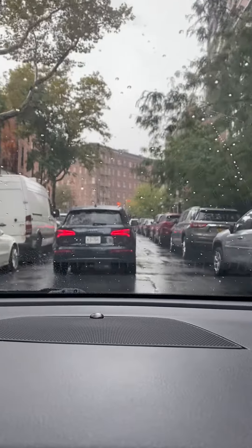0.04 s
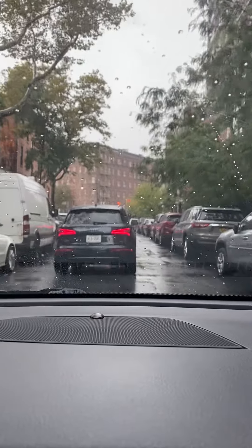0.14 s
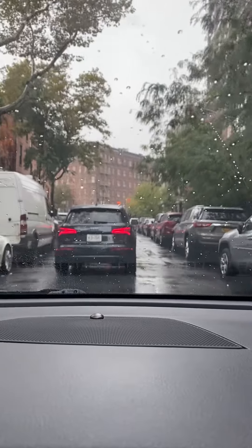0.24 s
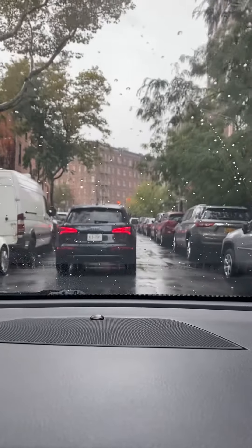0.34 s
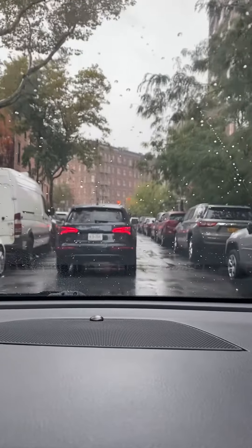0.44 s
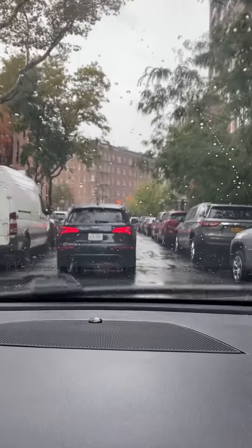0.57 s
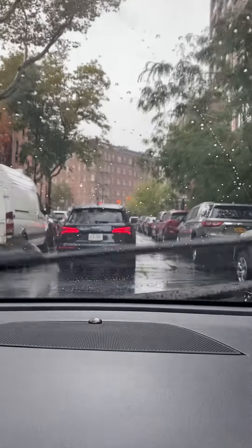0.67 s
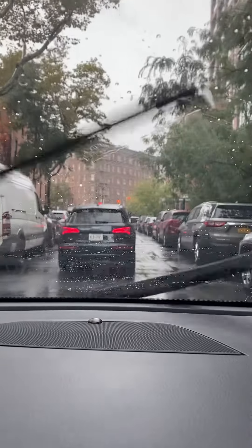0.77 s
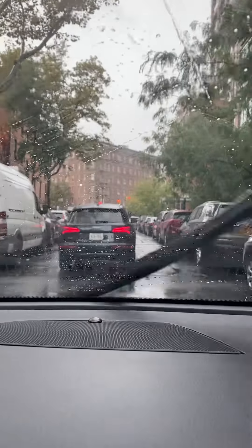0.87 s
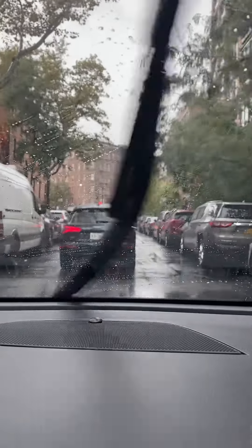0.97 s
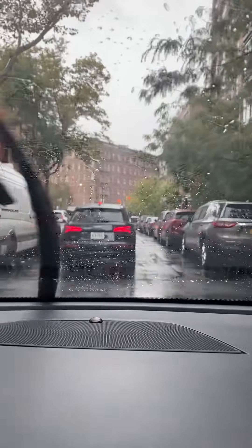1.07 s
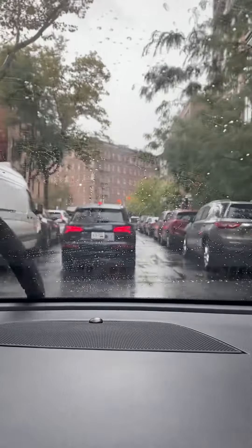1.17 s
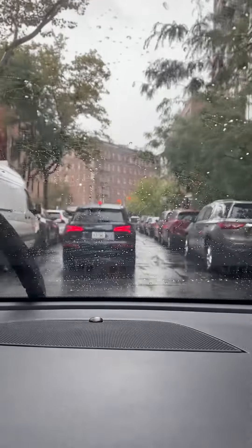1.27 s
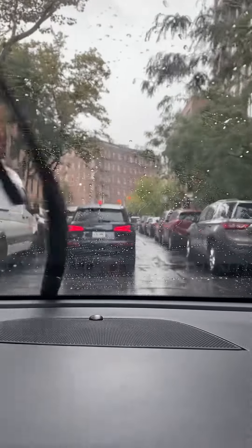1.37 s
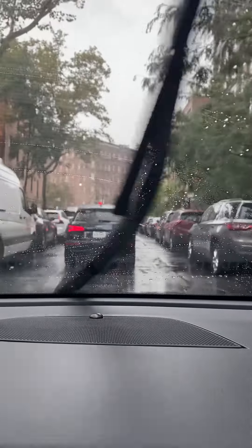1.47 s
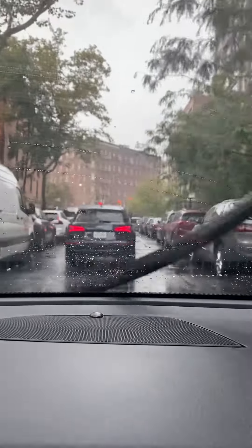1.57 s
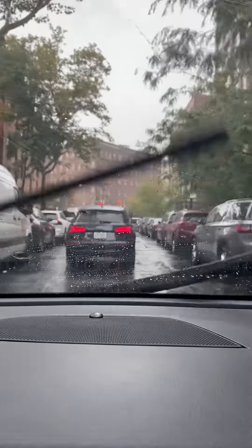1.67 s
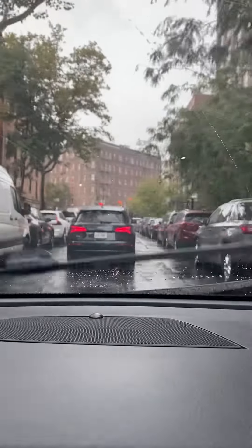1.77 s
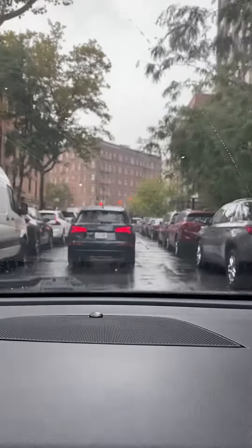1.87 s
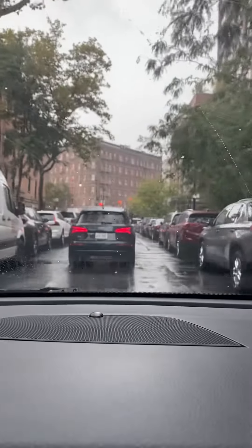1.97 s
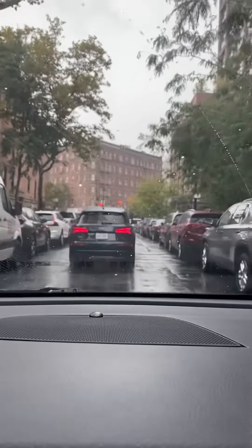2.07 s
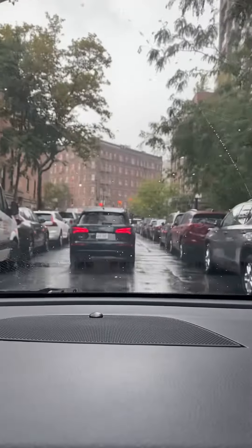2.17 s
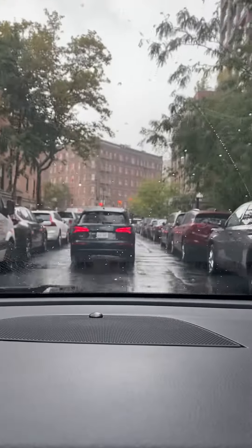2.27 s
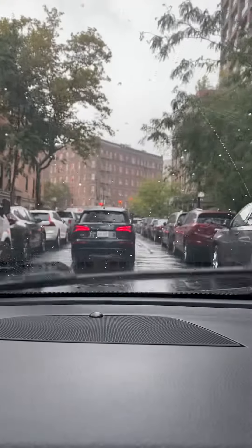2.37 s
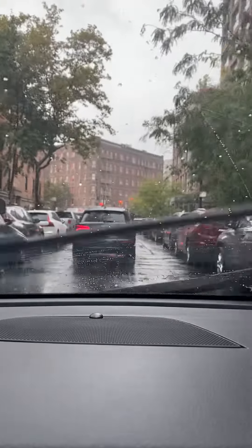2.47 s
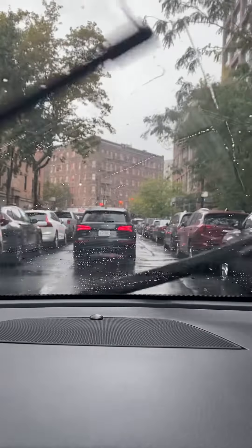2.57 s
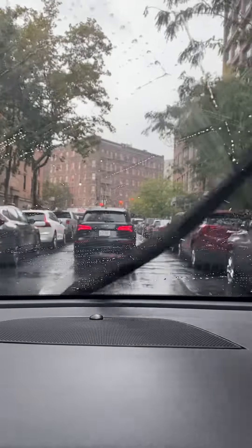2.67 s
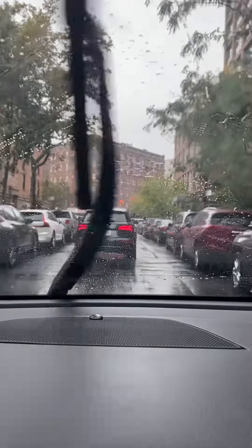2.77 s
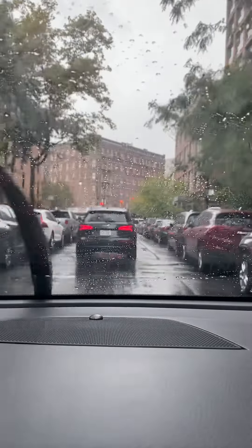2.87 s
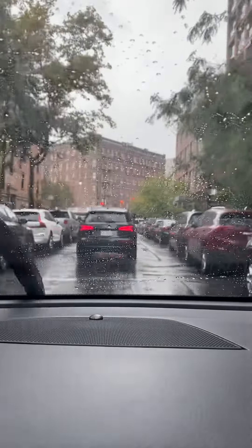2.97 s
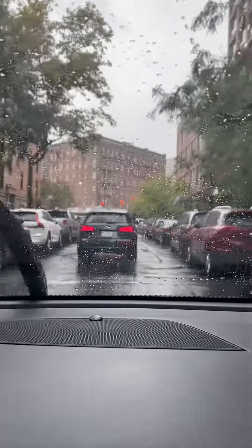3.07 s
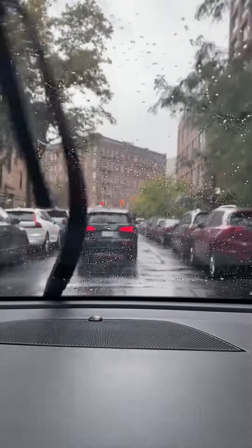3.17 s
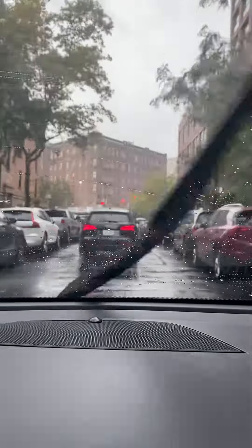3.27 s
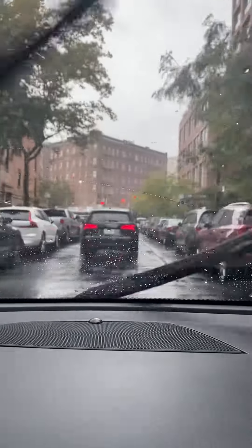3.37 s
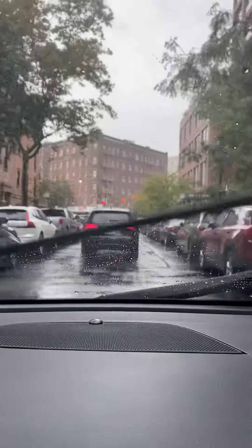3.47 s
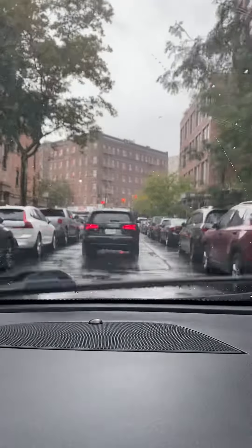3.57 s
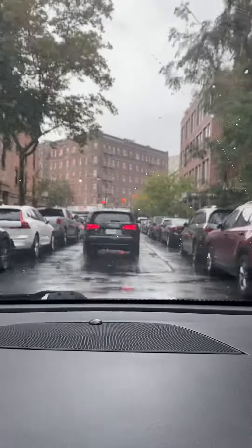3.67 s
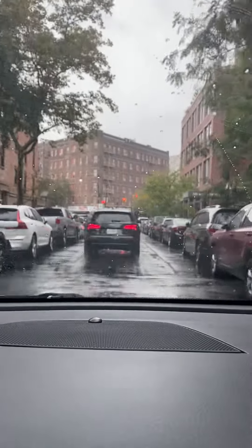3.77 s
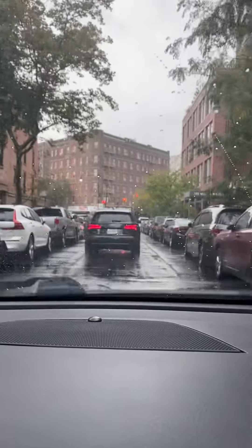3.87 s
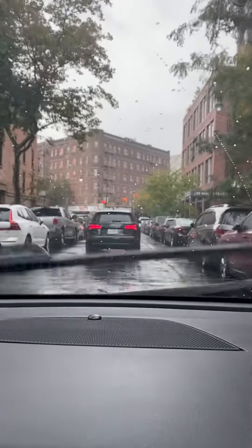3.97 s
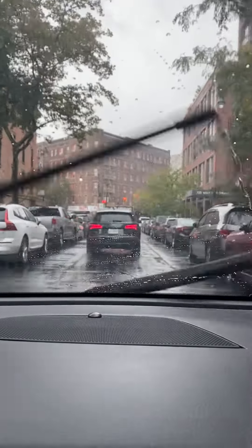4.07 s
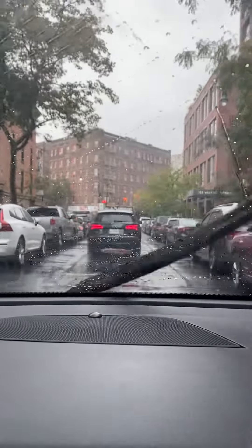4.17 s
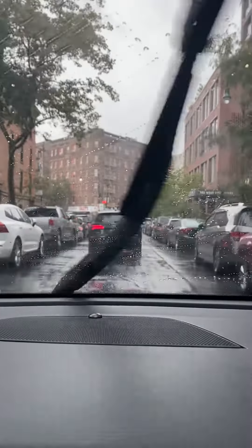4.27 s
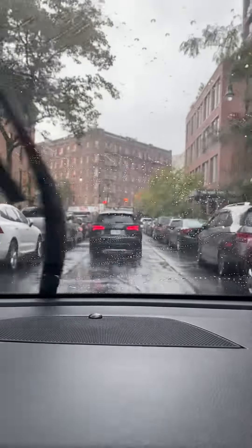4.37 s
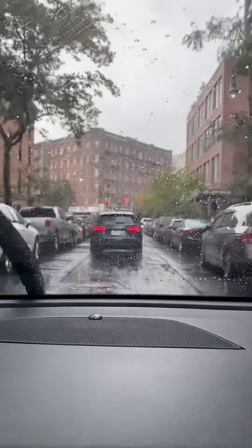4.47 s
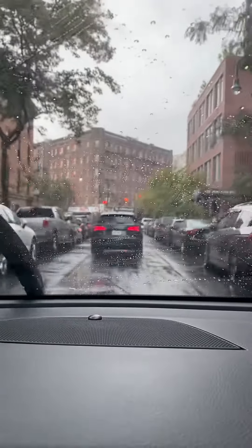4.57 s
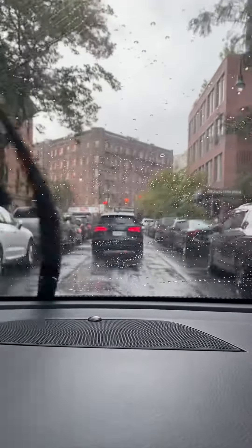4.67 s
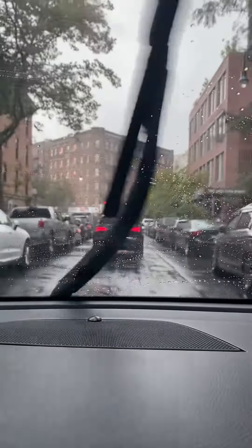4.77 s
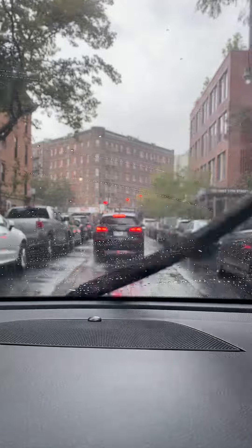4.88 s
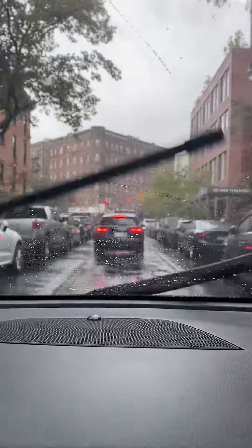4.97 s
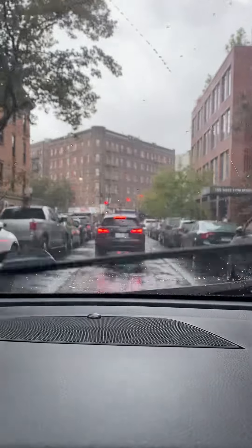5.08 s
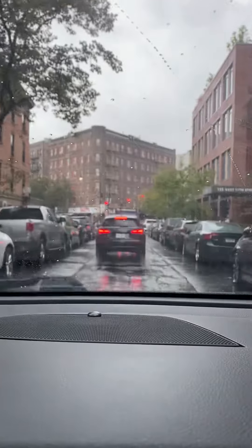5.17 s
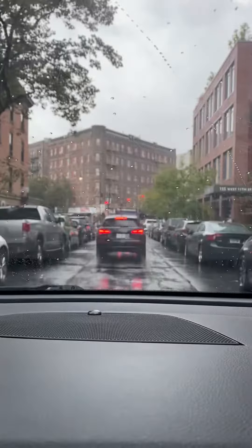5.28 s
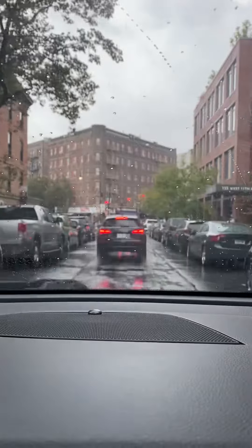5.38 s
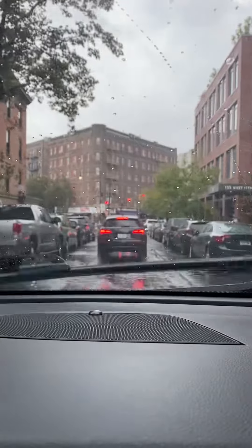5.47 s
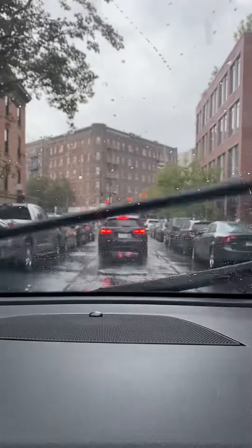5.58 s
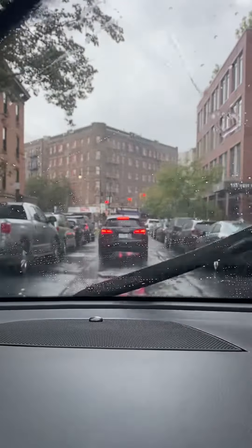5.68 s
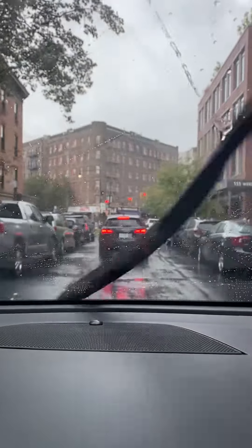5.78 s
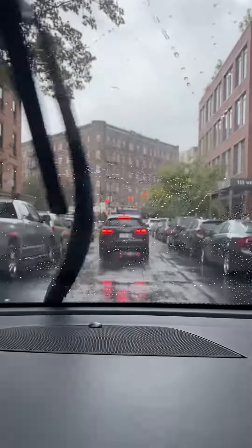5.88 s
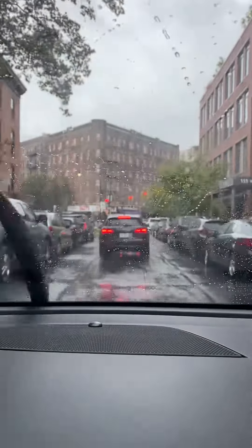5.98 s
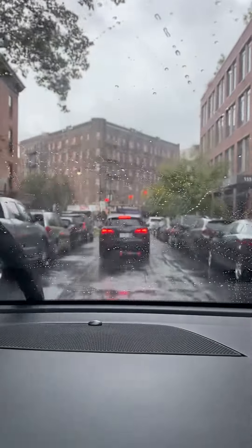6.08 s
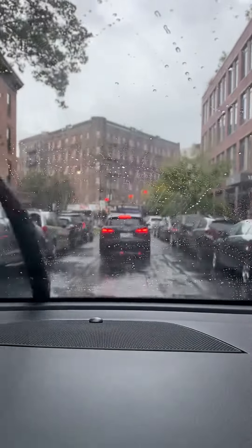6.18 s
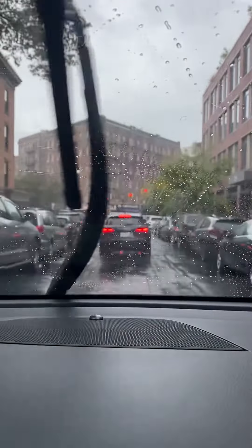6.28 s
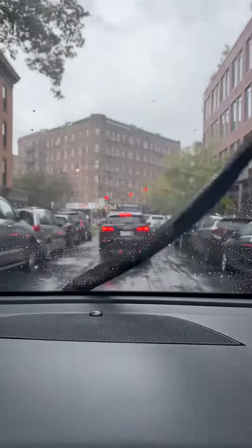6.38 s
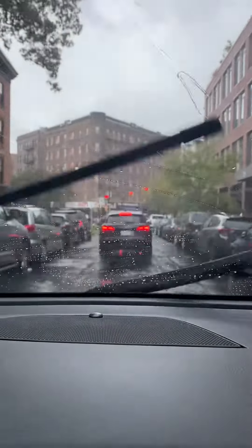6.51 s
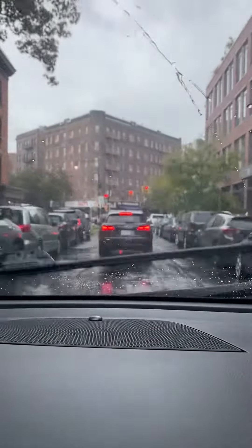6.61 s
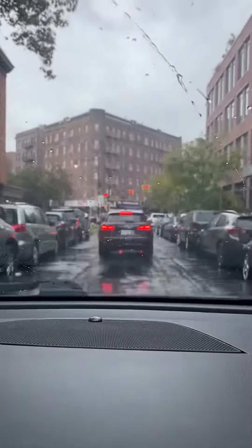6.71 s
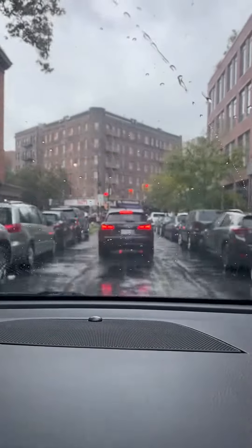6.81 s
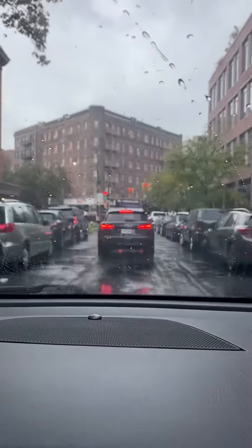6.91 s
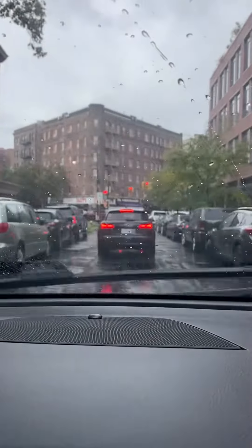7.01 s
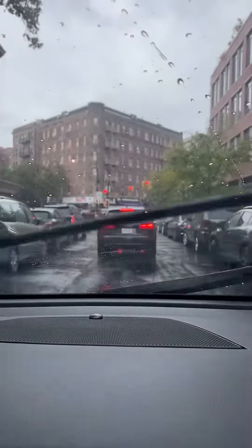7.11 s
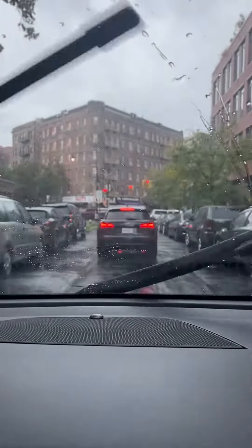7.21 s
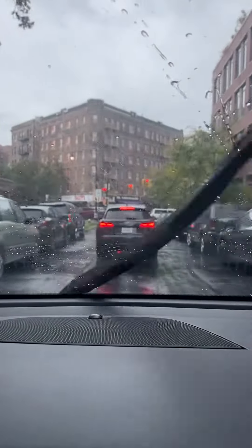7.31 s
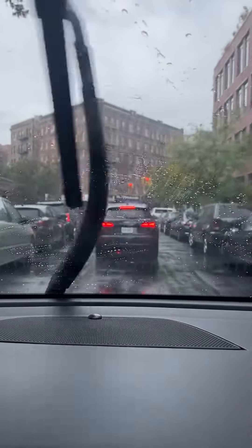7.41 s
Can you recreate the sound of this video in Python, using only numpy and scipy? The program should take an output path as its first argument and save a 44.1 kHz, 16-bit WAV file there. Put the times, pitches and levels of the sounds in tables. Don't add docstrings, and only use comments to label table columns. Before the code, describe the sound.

A muffled car interior in rain, picked up in stereo by a phone above the dashboard. Deep cabin boom and dull road roar run throughout, with faint wet wash. A low engine hum swells from 0.1 seconds and vanishes around 1.4, followed by very faint panel hums until 2.3. Wiper strokes begin near 0.5, 2.3, 3.85, 5.4 and 6.95 seconds. Each starts with a slight squeak or creak, judders upward in several rubbery low grunts, then drags down in longer scrapes for about 0.7 seconds overall; the last is higher, groaning and weaker in scrape. Raindrops tick irregularly, with a bright splat at 2.15 and stronger ones near 5.6 and 5.75. Soft knocks accompany the mechanism, notably a low one at 5.1 and a sharper one at 7.0. Uneven tarmac thumps softly, and the rumble grows heavier after 5 seconds, ending mid-drive.

```python
import sys
import numpy as np
from scipy import signal
from scipy.fft import rfft, irfft, next_fast_len
from scipy.io import wavfile
from scipy.ndimage import uniform_filter1d

SR = 44100
rng = np.random.default_rng(int(sys.argv[2]) if len(sys.argv) > 2 else 0)


def file_out(sig):
    cols = np.atleast_2d(sig).T
    lim = np.clip(cols, -1, 1)
    pcm = np.round(lim * 32767).astype(np.int16)
    wavfile.write(sys.argv[1], SR, pcm)


def to_linear_factor(level_db):
    exponent = np.asarray(level_db, float) / 20
    return 10 ** exponent


N = 328545
SIZE = next_fast_len(N)
T, HZ = np.arange(N) / SR, np.fft.rfftfreq(SIZE, 1 / SR)


def evened(x):
    return x / np.sqrt(np.mean(x ** 2) + 1e-20)


def read(points, hz, axis=1):
    table = np.transpose(points)
    return np.interp(np.log(hz + 1), np.log(table[0] + 1), table[axis])


def curve(rows, axis):
    table = np.transpose(rows)
    return np.interp(T, table[0], table[axis])


def passed(x, gain_db):
    return irfft(rfft(x, SIZE) * to_linear_factor(gain_db), SIZE)[..., :N]


def colour(x, gain_db):
    return evened(passed(x, gain_db))


def band_db(lo_hz, hi_hz, order=3):
    below = 1 + (lo_hz / (HZ + 1)) ** (2 * order)
    above = 1 + (HZ / hi_hz) ** (2 * order)
    return -10 * np.log10(below * above)


def wobble(rate_hz):
    return colour(rng.standard_normal(N), band_db(.3, rate_hz, order=1))


def grains(per_s, spread_db, smear_s):
    size = to_linear_factor(spread_db * np.minimum(rng.exponential(1, N), 4))
    size = size * (rng.random(N) < per_s / SR)
    t = np.arange(2048) / SR
    echoes = rng.standard_normal((2, len(t))) * np.exp(-t / smear_s)
    smeared = signal.oaconvolve(size * rng.standard_normal((2, N)), echoes, axes=1)[:, :N]
    lasting_db = 10 * np.log10(uniform_filter1d(abs(rfft(echoes, SIZE)) ** 2, size=600, axis=1))
    return colour(smeared, -lasting_db)


def resonate(x, hz, width):
    turn = np.exp(2j * np.pi * np.cumsum(hz) / SR)
    r = np.exp(-np.pi * width / SR)
    return evened((turn * signal.lfilter([1 - r], [1, -r], x / turn)).real)


def patchy(x, depth_db):
    hz, t, z = signal.stft(x, nperseg=1024, noverlap=768)
    field = uniform_filter1d(rng.standard_normal(z.shape[1:]), size=4, axis=0)
    field = evened(uniform_filter1d(field, size=5, axis=1))
    return evened(signal.istft(z * to_linear_factor(depth_db * field), nperseg=1024, noverlap=768)[1][:, :N])


# (start [s], highest ring [Hz], extra arm groan [dB])
WIPE_STARTS = [
    (0.519, 237.5, -1),
    (2.31, 258, 1.1),
    (3.85, 255, 0.5),
    (5.389, 249.3, 0.7),
    (6.941, 295, 3),
]


def since_wipe():
    start, top_hz, groan_db = np.transpose(WIPE_STARTS)
    k = np.clip(np.searchsorted(start - .3, T) - 1, 0, None)
    return T - start[k], top_hz[k], groan_db[k]


# (peak [s], rise [s], fall [s], scrape level [dB], water hiss minus scrape [dB])
UP_JUDDERS = [(0.546, 0.018, 0.0046, -39.5, -21), (0.613, 0.027, .015, -23.5, -27.5),
              (0.689, 0.032, .017, -26, -21.5), (.772, 0.022, .035, -30, -18),
              (.854, 0.034, 0.029, -39, -30.5), (2.4, 0.034, .01, -25.5, -31),
              (2.453, 0.016, .03, -28.5, -16), (2.553, .028, .019, -28.5, -17),
              (2.601, 0.0061, 0.029, -34.5, -23.5), (3.855, 0.023, 0.0051, -46, -20),
              (3.93, 0.025, .016, -24, -29.5), (3.986, 0.017, .038, -27.5, -21.5),
              (4.079, .01, 0.046, -30, -20), (4.167, 0.012, 0.017, -35.5, -16),
              (5.484, 0.04, 0.013, -24, -27.5), (5.545, 0.024, 0.032, -28, -19.5),
              (5.643, 0.018, 0.04, -31, -16.5), (5.734, 0.021, 0.018, -38, -24),
              (6.934, 0.02, 0.026, -54.5, -4.5), (7.01, 0.014, 0.0045, -30.5, -24),
              (7.09, .038, 0.017, -36, -18), (7.183, 0.065, .05, -41, -20.5)]
# (peak [s], rise [s], fall [s], scrape level [dB])
DOWN_DRAGS = [(0.952, 0.027, 0.039, -30), (1.014, 0.0097, .05, -31.5), (1.144, .051, 0.0088, -26.5),
              (1.196, 0.042, 0.012, -31), (2.726, 0.046, 0.038, -30), (2.793, 0.019, 0.081, -29),
              (2.888, 0.012, .025, -27.5), (2.944, 0.026, .024, -27), (2.971, 0.016, 0.0084, -33.5),
              (4.274, 0.042, .024, -28), (4.308, 0.011, 0.035, -30), (4.403, 0.044, .055, -29),
              (4.461, 0.028, 0.021, -29), (4.497, 0.024, .03, -43), (5.846, 0.047, 0.059, -29),
              (5.946, .069, 0.024, -29.5), (6.012, 0.029, 0.015, -24), (6.1, 0.026, .03, -55),
              (7.294, .056, 0.057, -41), (7.369, 0.04, .015, -37.5), (7.425, 0.032, 0.046, -35.5)]
# (time [s], peak level [dB], ring over scrape [dB])
LIP_CATCHES = [(0.538, -24.5, 2.5), (0.573, -16.5, 3), (0.596, -14, 3.5), (0.624, -17.5, 3.5),
               (0.661, -19, 3), (0.732, -26, 3), (0.756, -22.5, 3), (0.829, -31, 3.5), (0.86, -31, 3),
               (0.912, -27, 3), (1.013, -20.5, 4), (1.123, -16, 2), (2.345, -25.5, 3), (2.359, -19.5, 3.5),
               (2.386, -15.5, 3.5), (2.43, -23, 2.5), (2.521, -23, 4), (2.537, -18.5, 3.5),
               (2.593, -24.5, 2.5), (2.667, -26.5, 3), (2.694, -20, 2), (2.88, -18, 3), (3.882, -23, 3),
               (3.902, -16, 3), (3.969, -21, 3.5), (4.027, -27, 3), (4.067, -20.5, 3), (4.164, -23.5, 3),
               (4.397, -21, 3), (4.447, -19.5, 3.5), (4.462, -17, 4), (5.414, -26.5, 3), (5.446, -16, 2),
               (5.53, -18, 3), (5.627, -22, 3.5), (5.732, -24.5, 2.5), (5.788, -24.5, 3.5),
               (5.853, -17.5, 3), (5.971, -19, 2), (7.001, -17.5, 2), (7.063, -26, 3.5), (7.279, -28.5, 3),
               (7.311, -27, 3), (7.343, -24.5, 3)]
UP_RING_DB, DOWN_RING_DB, DOWN_HISS_DB = 7, 0.5, -20.5
RING_LAG, HISS_LAG, MIDDLING_DB = 0.68, 0.2, -30
CATCH_DB, CATCH_RISE_S, CATCH_FALL_S, CATCH_HISS_DB = -13, 0.0023, 0.01, -27.5
STICK_S, STICK_SHARE = .007, 0.62


def friction_power():
    power = np.zeros((3, N))
    up = [(*row[:4], UP_RING_DB, row[4]) for row in UP_JUDDERS]
    down = []
    for row in DOWN_DRAGS:
        hiss_db = DOWN_HISS_DB - HISS_LAG * max(row[3] - MIDDLING_DB, 0)
        down.append((*row, DOWN_RING_DB, hiss_db))
    for s, rise, fall, db, ring_db, hiss_db in up + down:
        a, b = max(int((s - .2) * SR), 0), int((s + 0.17) * SR)
        lag = T[a:b] - s
        grip = np.exp(-(lag / np.where(lag < 0, rise, fall)) ** 2)
        ring_db = ring_db - RING_LAG * max(db - MIDDLING_DB, -4.)
        power[:, a:b] += grip * to_linear_factor([[db], [db + ring_db], [db + hiss_db]]) ** 2
    t = np.arange(2205) / SR
    jerk = (1 - np.exp(-t / CATCH_RISE_S)) ** 2 * np.exp(-t / CATCH_FALL_S)
    stick = 1 - STICK_SHARE * np.exp(-(t[::-1] / STICK_S) ** 2)
    for s, db, ring_db in LIP_CATCHES:
        a = round(s * SR)
        power[:2, :a][:, -len(t):] *= stick
        levels_db = db + CATCH_DB + np.array([[0], [ring_db], [CATCH_HISS_DB]])
        power[:, a:][:, :len(t)] += jerk * to_linear_factor(levels_db) ** 2
    return power


# (time from its start [s], ring pitch [share of highest], arm groan over ring [dB],
# edge squeal over scrape [dB])
WIPE_COURSE = [
    (-.01, 0.75, -5, -1.5),
    (.07, .99, -15.5, -16),
    (.28, 0.87, -2.5, -13.5),
    (.4, 0.91, 4.5, -14.5),
    (.62, .85, 4, -16),
    (0.751, 0.66, 4, -12),
]
# (frequency [Hz], density [dB per Hz])
RUBBER_COLOUR = [(250, -11.5), (400, -1), (600, -6.5), (850, -8.5), (1200, -15), (1600, -25.5),
                 (2200, -29.5), (3000, -35.5), (4000, -34.5), (5000, -36.5), (6300, -39), (8000, -44.5),
                 (10000, -52.5), (13000, -65.5)]
SLIP_LOCK_DB, SLIP_EDGE = 1.2, .1


def wipers():
    power = friction_power()
    age, top_hz, arm_db = since_wipe()
    at, *columns = np.transpose(WIPE_COURSE)
    share, groan_db, squeal_db = (np.interp(age, at, column) for column in columns)
    ring_hz = share * top_hz
    chatter = to_linear_factor(0.85 * wobble(76.0))
    slips = grains(per_s=3000., spread_db=2.0, smear_s=0.0076)
    film = grains(per_s=3500.0, spread_db=4.0, smear_s=0.0022)
    stroke = read(RUBBER_COLOUR, HZ)
    scrape = patchy(colour(slips, stroke + band_db(358.0, 1500.)), depth_db=2.5)
    squeal = colour(slips + 0.73 * film, stroke + band_db(1500., 2650.))
    squeal = patchy(squeal, depth_db=3.5) * to_linear_factor(squeal_db)
    low = colour(slips, band_db(170., 350.0))
    ring = evened(resonate(low, ring_hz, 36.0) + 0.31 * low)
    locked = evened(chatter * to_linear_factor(SLIP_LOCK_DB * np.clip(ring[0], -2, 2)))
    chatter = locked * np.sqrt(np.mean(chatter ** 2))
    ring = ring + SLIP_EDGE * colour(ring ** 2, band_db(300., 900.))
    groan = colour(slips, band_db(125., 160.0)) * to_linear_factor(groan_db + arm_db)
    hiss = colour(film, stroke + band_db(2500., 13500.))
    layers = [(scrape + squeal) * chatter, ring + groan, hiss * chatter ** 0.6]
    return (np.sqrt(power)[:, None] * layers).sum(0)


# (start [s], length [s], level [dB])
LIP_CREAKS = [
    (0.513, 0.034, -53),
    (2.297, 0.039, -65),
    (3.823, .05, -58),
    (5.372, 0.026, -58),
]
# (time [s], level [dB], mode [Hz], t60 [s])
LINKAGE_KNOCKS = [(1.778, -36.5, 760, 0.078), (1.779, -47.5, 1250, .06), (1.553, -43.5, 880, .06),
                  (2.165, -43.5, 960, .08), (7.0, -26.5, 1145, 0.07), (7.001, -26, 910, 0.083),
                  (7.002, -39, 2100, 0.067), (2.5, -41.5, 780, .15), (3.905, -23.5, 370, 0.19),
                  (7.067, -32.5, 347, 0.08), (1.29, -44.5, 1480, 0.09), (1.291, -47, 2300, .08),
                  (1.606, -39.5, 2530, .045), (5.294, -44, 1500, .05), (3.97, -27, 330, 0.17),
                  (0.65, -27, 330, .12), (5.85, -32, 550, .2), (5.1, -21, 170, 0.17),
                  (6.128, -49, 2500, .08), (2.6, -43, 990, .1)]


def linkage():
    out, t = np.zeros((2, N)), np.arange(8820) / SR
    for s, length, db in LIP_CREAKS:
        pulse_hz = 75. * (1 + .5 * rng.standard_normal(len(t) + 1))
        pulses = np.diff(np.floor(np.cumsum(pulse_hz) / SR)) > 0
        pulses = pulses * rng.uniform(0.43, 1, (2, len(t))) * (t < length)
        lip = resonate(pulses + 1e-9, 2100. + 0 * t, 290.0)
        lip = resonate(lip, 1400.0 + 0 * t, 780.0)
        out[:, round(s * SR):][:, :len(t)] += to_linear_factor(db) * lip * np.sqrt(length / t[-1])
    for s, db, hz, t60 in LINKAGE_KNOCKS:
        panel = resonate(rng.standard_normal((2, len(t))), hz + 0 * t, 0.16 * hz)
        panel = resonate(panel, hz + 0 * t, 0.47 * hz)
        puff = to_linear_factor(db - 60 * t / t60) * (1 - np.exp(-t / 0.0027))
        out[:, round(s * SR):][:, :len(t)] += puff * panel
    return out


# (time [s], peak level [dB], low thud over tick [dB],
# high fizz over tick [dB]); hard drops first
HARD_DROPS = [(0.167, -53, -0.5, -15.5), (0.7655, -36.5, -0.5, -9), (0.948, -33, -5.5, -6),
              (1.287, -41, 2.5, -20.5), (2.2956, -51, 13, -18), (2.3436, -61, -4, -33),
              (2.694, -36, -3.5, -10), (2.7735, -35, -2, -11), (3.672, -58, -10, -2.5),
              (3.904, -41, 7.5, -27), (4.0684, -43.5, -5.5, -5.5), (4.0818, -38.5, -2.5, -13),
              (4.241, -36.5, -1.5, -13.5), (5.247, -46, 3, -15), (5.2938, -30, -10.5, -20.5),
              (5.582, -26.5, -2.5, -3), (5.6246, -36, 4.5, -7), (7.203, -44.5, 10, 1.5)]
SOFT_SPLATS = [
    (1.467, -42, -18, -23.5),
    (2.018, -42.5, 4, -20.5),
    (2.1563, -30.5, 0, -7),
    (4.3279, -32, -5, -19.5),
    (5.743, -25.5, 1, -18),
    (6.0826, -37.5, -6.5, -17),
]
CRISP_TICKS = [
    (1.5522, -40.5, 3.5, -21),
    (1.6079, -32.5, -2.5, -19),
    (2.8794, -32, 2.5, -11),
    (6.921, -49, 12, -16.5),
    (6.9377, -43.5, 7.5, -22),
    (7.0716, -46.5, 12.5, -16),
    (7.128, -47.5, 15, -18),
    (7.279, -53, 6, -14.5),
    (7.342, -46, 4, -10),
    (3.838, -52.5, 9, -20),
]
FINE_SPATTER = [(0.5866, -48, -12, -3), (0.6644, -47.5, -14, -3), (0.9122, -46.5, -12, -3),
                (1.0128, -43, -10, -3), (1.0869, -44.5, -12, -3), (1.1253, -42.5, -12, -3),
                (2.4376, -45.5, -12, -3), (2.5242, -41.5, -12, -3), (2.804, -43, -12, -3),
                (3.9818, -45.5, -11, -3), (4.115, -43.5, -12, -3), (4.1609, -48.5, -10, -3),
                (4.1676, -46, -12, -3), (4.4086, -43.5, -11, -3.5), (5.443, -48.5, -12, -3),
                (5.5624, -45.5, -11.5, -3), (5.5754, -34, -12, -3), (5.6151, -44.5, -12, -3),
                (5.7972, -46.5, -12, -3), (5.8725, -39.5, -12, -3), (5.9764, -44, -12, -3),
                (6.33, -49, -13, -3)]
# (t60 [s], spreading time [s], needle tick [share])
HARD, SOFT = (0.067, 0.0021, 1.44), (0.07, 0.0047, .1)
CRISP, FINE = (.042, 0.0011, 1.6), (.02, .0004, 1.5)
FIZZ_SHORTER = 2.5


def drops():
    hits, t = np.zeros((3, 2, N)), np.arange(4410) / SR
    kinds = [(HARD_DROPS, HARD), (SOFT_SPLATS, SOFT), (CRISP_TICKS, CRISP), (FINE_SPATTER, FINE)]
    rows = [tuple(row) + kind for table, kind in kinds for row in table]
    noise = rng.standard_normal((len(rows), 3, 2, len(t)))
    for (s, db, low_db, high_db, t60, spread, needle), burst in zip(rows, noise):
        rise = 1 - np.exp(-t / (spread * np.array([[1.8], [1], [.7]])))
        splash_s = 0.00086 + 2 * spread
        shape = rise * (0.43 * np.exp(-t / splash_s) + .5 * to_linear_factor(-60 * t / t60))
        shape[2] *= np.exp(-(FIZZ_SHORTER - 1) * t / (splash_s + .05 * t60))
        shape = shape + needle * np.exp(-t / 0.00044)
        level = to_linear_factor([[db + low_db], [db], [db + high_db]])
        a = round(s * SR)
        hits[:, :, a:a + len(t)] += ((level * shape)[:, None] * burst)[..., :N - a]
    bands = [band_db(550., 2000.0) + 11.5, band_db(2500., 5200.0) + 4.0, band_db(6000., 16000.0) - 3.0]
    return sum(passed(x, gain_db) for x, gain_db in zip(hits, bands))


# (time [s], frequency [Hz], level [dB])
FIRING = [
    (0.0, 114.5, -58.5),
    (0.124, 108.1, -40),
    (0.436, 118.5, -34.5),
    (0.716, 114.4, -32.5),
    (0.974, 117.6, -33.5),
    (1.114, 122.5, -38.5),
    (1.246, 127.8, -32),
    (1.4, 125.4, -54),
]


def engine():
    turns = np.cumsum(curve(FIRING, axis=1) + 1.7 * wobble(2.4)) / SR
    fade_db = -40 * np.clip((T - FIRING[-1][0]) / 0.17, 0, 1)
    level = np.sqrt(2) * to_linear_factor(curve(FIRING, axis=2) + fade_db)
    return level * np.sin(2 * np.pi * turns) * [[1], [0]]


# (start [s], end [s], mode [Hz], width [Hz], level [dB])
PANEL_HUMS = [
    (1.5, 2.1, 420, 8., -52.5),
    (2.15, 2.33, 385, 8., -50),
    (1.3, 1.8, 252, 14., -48),
    (1.74, 2.1, 510, 14., -56.5),
]


def hums():
    out = np.zeros((2, N))
    for start, end, hz, width, db in PANEL_HUMS:
        t = np.arange(round((end - start) * SR)) / SR
        swell = np.clip(np.minimum(t, t[-1] - t) / .04, 0, 1)
        panel = resonate(rng.standard_normal((2, len(t))), hz + 0 * t, width)
        panel = resonate(panel, hz + 0 * t, 3. * width)
        out[:, round(start * SR):][:, :len(t)] += to_linear_factor(db) * swell * panel
    return out


# (frequency [Hz], density [dB per Hz])
BOOM_COLOUR = [(14, -20.5), (24, -10), (32, -1), (40, -2), (45, 3.5), (53, 0.5), (82, -0.5), (100, -4),
               (140, -8), (200, -15.5)]
# (frequency [Hz], density [dB per Hz])
STREET_COLOUR = [(130, -4.5), (200, -3.5), (300, -14), (450, -21.5), (650, -28), (1000, -33), (1500, -37.5),
                 (2200, -39), (3200, -41), (4500, -43.5), (6000, -47.5), (8000, -52), (10500, -57),
                 (14000, -64.5)]
# (time [s], rolling level [dB])
ROLLING_LEVEL = [(0, -8), (.25, -8), (.45, -3.5), (1.35, -3.5), (2.23, -0.5), (3.1, -3), (3.7, -2.5),
                 (5.2, 1), (6.25, 3.5), (6.55, 1.5), (7.45, 4)]
# (time [s], length [s], boom level [dB], drone level [dB])
ROAD_BUMPS = [(0.562, 0.034, -35, -28.5), (0.816, .08, -40.5, -30.5), (1.396, 0.068, -31.5, -35),
              (1.502, 0.044, -39, -38), (1.68, 0.059, -25.5, -33.5), (1.971, .05, -27.5, -39),
              (2.388, .1, -34, -26), (2.713, 0.07, -46, -37), (2.951, 0.17, -40.5, -28.5),
              (3.302, 0.1, -27, -31), (3.494, 0.082, -32, -27), (3.887, 0.082, -41, -28),
              (4.087, 0.068, -32.5, -42.5), (4.383, 0.027, -21.5, -35.5), (1.646, 0.014, -40, -25.5),
              (4.562, 0.071, -32, -27), (4.945, 0.16, -34.5, -28.5), (5.145, 0.021, -33, -25.5),
              (5.285, 0.031, -35, -36), (5.633, 0.044, -20, -28), (5.724, 0.025, -19.5, -31.5),
              (5.962, .04, -30, -23), (6.308, .06, -17.5, -26.5), (6.537, .07, -22.5, -36),
              (6.893, 0.15, -33.5, -29.5), (4.795, 0.051, -34, -27.5), (7.061, 0.026, -22.5, -27),
              (7.299, 0.025, -21, -30)]
BOOM_DB, DRONE_DB, ROAR_DB, SPLASH_DB, WASH_DB = -31.5, -32.5, -40.5, -52.5, -65.5
BOOM_SHARE, DRONE_SHARE, SPLASH_SHARE, WASH_SHARE = 0.69, 0.82, 0.78, 0.51
RUNOFF_DB, RUNOFF_AFTER_S, RUNOFF_S = 4, 0.57, 0.56


def road():
    boom, drone, roar, splash, wash = rng.standard_normal((5, 2, N))
    street, body = read(STREET_COLOUR, HZ), read(BOOM_COLOUR, HZ)
    rolling = curve(ROLLING_LEVEL, axis=1)
    shake = to_linear_factor([BOOM_DB + BOOM_SHARE * rolling, DRONE_DB + DRONE_SHARE * rolling]) ** 2
    for s, length, boom_db, drone_db in ROAD_BUMPS:
        a, b = max(int((s - .4) * SR), 0), int((s + .4) * SR)
        shake[:, a:b] += to_linear_factor([[boom_db], [drone_db]]) ** 2 * np.exp(-((T[a:b] - s) / length) ** 2)
    boom = colour(boom, body + band_db(14., 54.0)) * np.sqrt(shake[0])
    drone = colour(drone, body + band_db(77.0, 110.0)) * np.sqrt(shake[1])
    roar = colour(roar, street + band_db(135., 430.0)) * to_linear_factor(ROAR_DB + rolling + 0.47 * wobble(8.))
    patter = grains(per_s=490.0, spread_db=0.0, smear_s=0.0055)
    gusts = wobble(14.0)
    runoff = sum(RUNOFF_DB * np.exp(-((T - s - RUNOFF_AFTER_S) / RUNOFF_S) ** 2) for s, *_ in WIPE_STARTS)
    splash = colour(splash + .5 * patter, street + band_db(490.0, 2500.))
    splash = splash * to_linear_factor(SPLASH_DB + SPLASH_SHARE * rolling + 0.53 * gusts)
    wash = colour(wash + 0.5 * patter, street + band_db(2500., 19000.0))
    wash = wash * to_linear_factor(WASH_DB + WASH_SHARE * rolling + runoff + 0.64 * gusts)
    return boom + drone + roar + splash + wash


def scene():
    return wipers() + linkage() + drops() + engine() + hums() + road()


def roll_off(x):
    return signal.sosfilt(signal.butter(12, 15800, fs=SR, output="sos"), x)


# (frequency [Hz], likeness [0-1], right lead [rad], left minus right [dB])
MIC_PORTS = [(215, 0.99, 0.06, -0.7), (344, 0.97, 0.06, -0.7), (680, 0.7, -0.4, 0.2), (800, 0.25, 0.7, 1.5),
             (1150, 0.62, 0.2, 0.9), (1722, 0.92, -0.13, 0.3), (2583, 0.67, -1.12, -1.6),
             (4306, 0.62, -1.58, -0.8), (4823, 0.73, -3.04, -2.1), (5254, 0.55, -5.94, 0.9),
             (6029, 0.85, -6.87, -0.2), (7321, 0.73, -7.59, -0.0), (10335, 0.76, -9.01, -0.4),
             (14211, 0.95, -9.4, -0.1)]


def record(dry):
    direct, scattered = rfft(dry, SIZE) * to_linear_factor(band_db(33, 17000., order=2))
    same = np.where(HZ < 150, 1, read(MIC_PORTS, HZ))
    lead = read(MIC_PORTS, HZ, axis=2) * np.clip(HZ / 300, 0, 1)
    tilt = to_linear_factor(read(MIC_PORTS, HZ, axis=3) / 2 * np.clip(HZ / 200, 0, 1))
    right = same * np.exp(1j * lead) * direct + np.sqrt(1 - same ** 2) * scattered
    ports = irfft([direct * tilt, right / tilt], SIZE)[:, :N]
    return roll_off(ports)


dry = scene()
out = record(dry)
file_out(out)
```